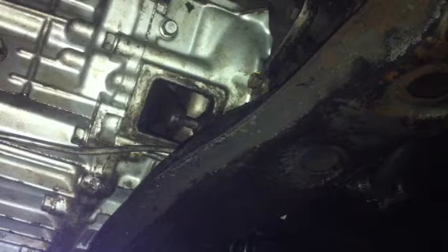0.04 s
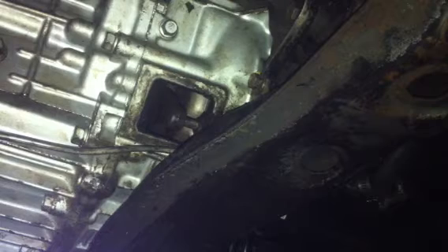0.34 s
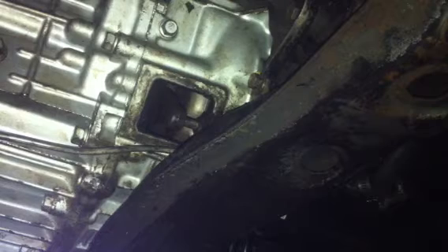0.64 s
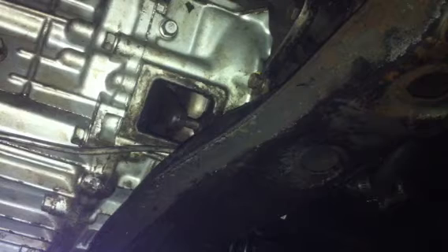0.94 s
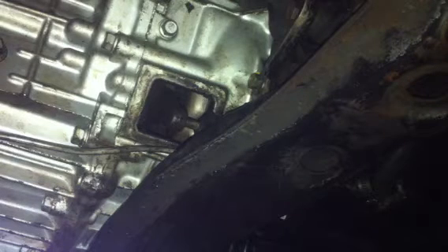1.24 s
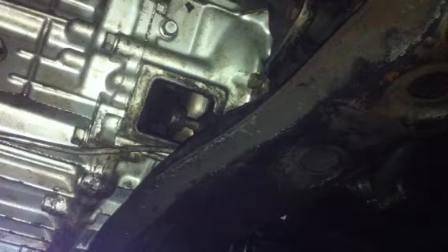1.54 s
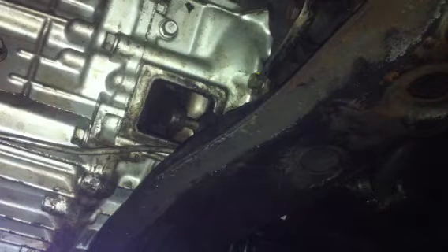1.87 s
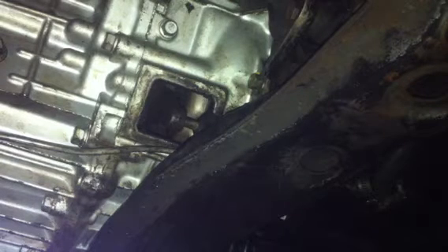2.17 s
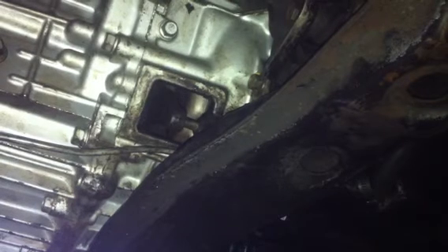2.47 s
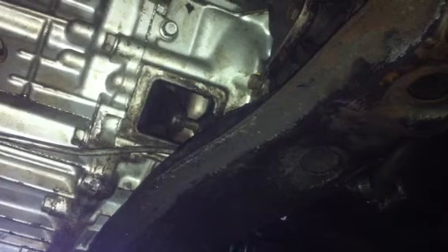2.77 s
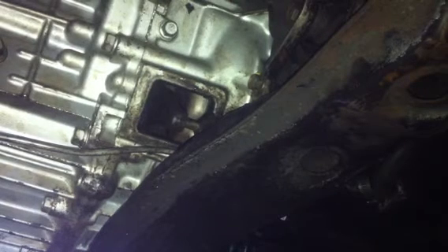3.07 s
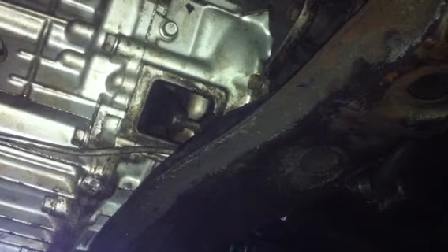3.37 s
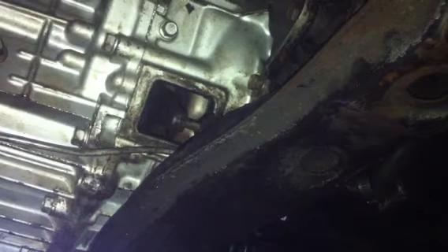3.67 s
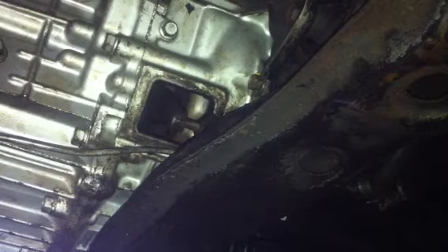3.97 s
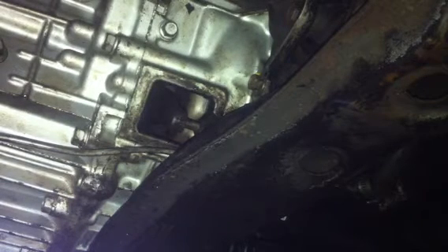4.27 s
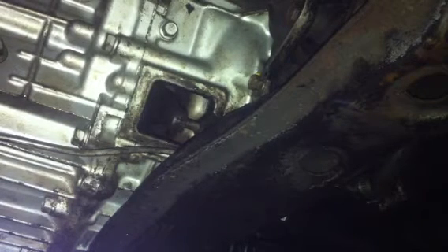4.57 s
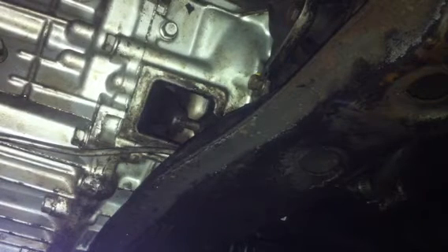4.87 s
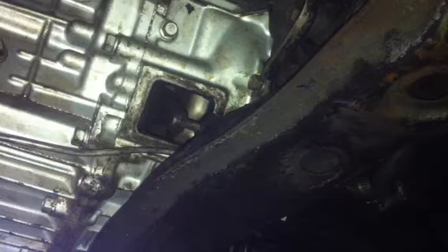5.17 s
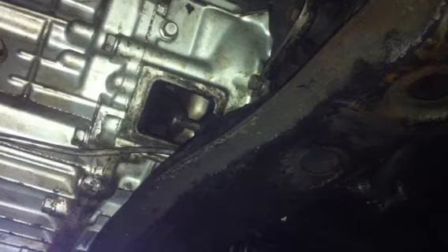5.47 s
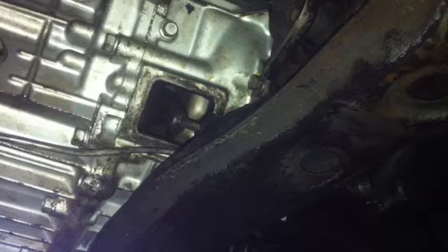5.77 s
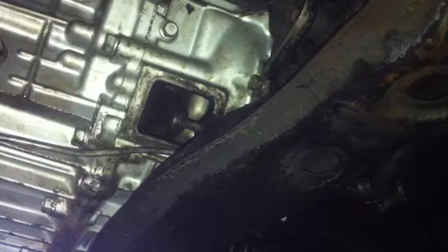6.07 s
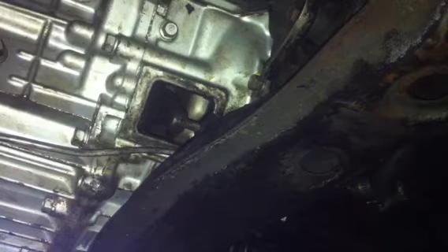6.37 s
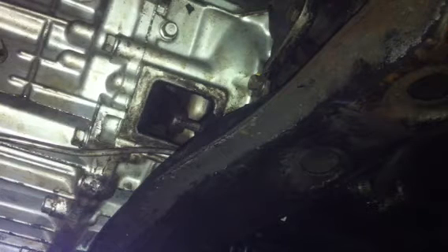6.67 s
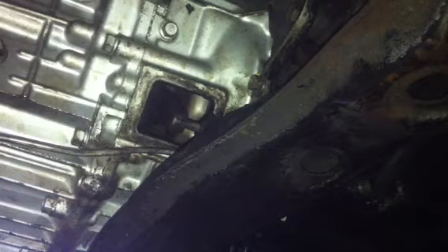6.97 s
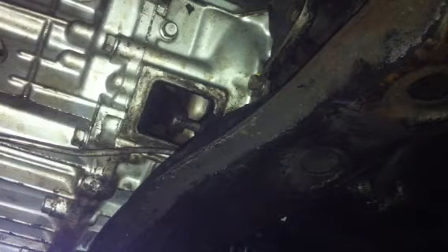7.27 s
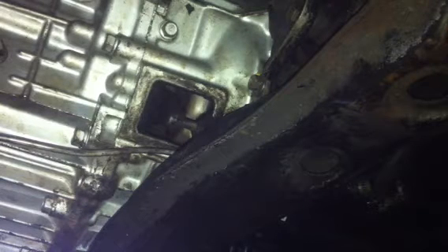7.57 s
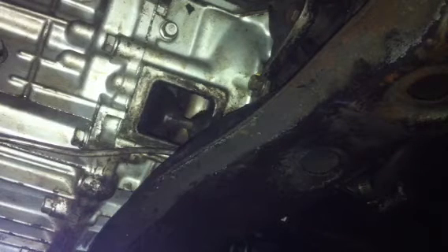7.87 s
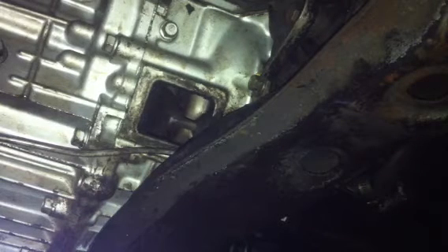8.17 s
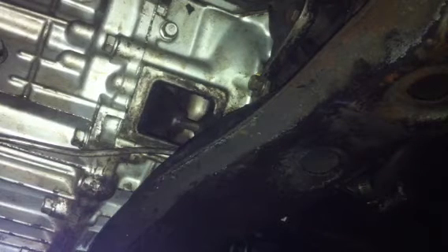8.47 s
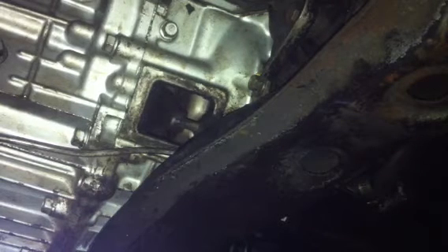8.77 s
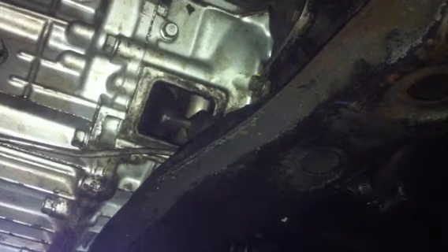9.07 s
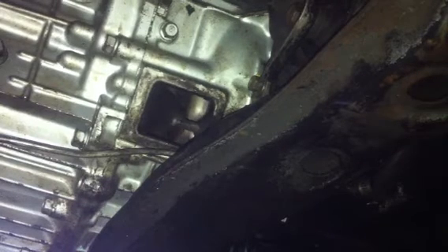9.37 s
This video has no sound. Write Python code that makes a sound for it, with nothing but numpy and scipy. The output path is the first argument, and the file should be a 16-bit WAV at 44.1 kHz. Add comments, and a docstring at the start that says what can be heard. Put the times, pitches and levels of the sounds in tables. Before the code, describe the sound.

Under a parked car with the engine off, a clutch linkage is worked. A metal lever knocks and clicks at uneven intervals, joined by hollow taps from a loose rod. Midway the knocks come closer together, with small steel clinks, soft scraping and a low rumble. After a lull, one firm clack sounds near the end. The microphone is close to the gearbox, with a short echo and faint hiss and hum.

```python
"""Clutch linkage under a parked car

Close to the gearbox, engine off, the clutch is worked by pedal. Each impact excites the natural modes
of the part struck: the lever knocks against its stops and shakes the housing, a loose rod taps
hollowly and a small steel part clinks, all echoing between floor and underbody. Sliding surfaces rub
by stick-slip friction. Behind them lie a soft murmur of the body, a faint hum and microphone hiss."""
import sys
import numpy as np
from scipy import signal
from scipy.fft import rfft, irfft
from scipy.io import wavfile

SR = 44100
rng = np.random.default_rng(int(sys.argv[2]) if len(sys.argv) > 2 else 0)


def wav_out(sig):
    """Save sig, one row per channel (or a flat mono array), as 16-bit PCM at SR to the path in sys.argv[1]."""
    wavfile.write(sys.argv[1], SR, np.round(np.clip(np.atleast_2d(sig).T, -1, 1) * 32767).astype(np.int16))


N = 416304
TIME = np.arange(N) / SR


def amp(db):
    """Amplitude ratio of a level in decibels."""
    return 10 ** (np.asarray(db) / 20)


def unit(x):
    """Normalisation to rms 1."""
    return x / np.sqrt(np.mean(x ** 2) + 1e-20)


def curve_at(points, hz):
    """Interpolation on a logarithmic frequency axis."""
    point_hz, value = np.transpose(points)
    return np.interp(np.log(hz + 1), np.log(point_hz + 1), value)


def coloured(x, spectrum):
    """Spectral shaping, normalised to rms 1."""
    gain = amp(curve_at(spectrum, np.fft.rfftfreq(N, 1 / SR)))
    return unit(irfft(rfft(x) * gain, N))


def drift(rate_hz):
    """Random fluctuation: low-pass noise of rms 1."""
    passband = np.fft.rfftfreq(N, 1 / SR) < rate_hz
    return unit(irfft(rfft(rng.standard_normal(N)) * passband, N))


def decay(t, t60):
    """Exponential damping by 60 dB in t60 seconds."""
    return np.exp(-np.log(1000) * t / t60)


# Air and microphone hiss: (frequency [Hz], relative spectral density [dB])
HISS_SPECTRUM = [(15, -53), (25, -37), (75, -26), (107, 4), (144, -9), (178, 12), (233, -17), (469, -7.5),
                 (782, -11.5), (1050, -1.5), (1270, -7.5), (1900, -8.5), (2060, -16), (5730, -16),
                 (15500, -21.5)]
# Tones of the hum: (frequency [Hz], relative level [dB])
HUM_TONES = [(188.4, -80), (909.8, -80.5), (1206, -83)]
def hiss_and_hum(hiss_db, hum_gain_db, waver_rad):
    """Stationary noise lies under faint tones that waver by random phase modulation."""
    hum = sum(amp(db) * np.sqrt(2) * np.sin(2 * np.pi * hz * TIME + waver_rad * drift(8.6))
              for hz, db in HUM_TONES)
    hiss = coloured(rng.standard_normal(N), HISS_SPECTRUM)
    return amp(hiss_db) * hiss + amp(hum_gain_db) * hum


# Murmur of the car body: (frequency [Hz], relative spectral density [dB])
MURMUR_SPECTRUM = [(50, -23.5), (170, -2), (280, -7.5), (560, -7), (1100, -14.5), (8000, -32.5)]
def body_murmur(level_db):
    """Weight shifting on the pedal stirs the body: dull noise under slow amplitude modulation."""
    return amp(level_db + 2 * drift(4)) * coloured(rng.standard_normal(N), MURMUR_SPECTRUM)


# Sliding strokes: (centre time [s], half length [s], scrape level [dB], rumble level [dB])
STROKES = [(0.27, 0.04, -79, -56), (3.937, 0.1, -73, -58.5), (5.241, 0.086, -53.5, -47),
           (5.408, 0.084, -54, -51), (5.823, 0.043, -54.5, -43.5), (5.96, 0.076, -48.5, -49.5),
           (6.115, 0.075, -54, -41), (6.317, 0.08, -57, -46.5), (6.467, 0.037, -53, -48),
           (6.571, 0.11, -53, -49), (6.779, 0.076, -53.5, -53.5), (7.03, 0.079, -54.5, -62),
           (7.36, 0.062, -45.7, -52.5), (7.91, 0.054, -60, -61), (8.881, 0.042, -55, -71),
           (9.131, 0.12, -61, -57)]
# Scraping surfaces and rumbling body: (frequency [Hz], relative spectral density [dB])
SCRAPE_SPECTRUM = [(240, -39), (400, 3), (445, -8), (942, -8), (1050, -6), (2150, -4), (8930, -21.5),
                   (15500, -34.5)]
RUMBLE_SPECTRUM = [(50, -34), (100, -21), (165, 9.5), (215, -2), (290, 2), (370, -1), (460, -8.5),
                   (620, -6.5), (1200, -16), (3000, -52)]
def sliding(slips_per_s, slip_spread_db, flutter_db):
    """Stick-slip friction: tiny slips scrape and the body rumbles, both in proportion to speed."""
    scrape_gain, rumble_gain = np.zeros((2, N))
    for centre, half, scrape_db, rumble_db in STROKES:
        speed = np.exp(-((TIME - centre) / half) ** 2)
        scrape_gain += amp(scrape_db) * speed
        rumble_gain += amp(rumble_db) * speed
    slipping = rng.random(N) < slips_per_s / SR
    strength = amp(slip_spread_db * np.minimum(rng.exponential(1, N), 4))
    slips = slipping * strength * rng.choice([-1, 1], N)
    scrape = coloured(unit(slips) + rng.standard_normal(N), SCRAPE_SPECTRUM)
    scrape *= amp(flutter_db * drift(70))
    rumble = coloured(rng.standard_normal(N), RUMBLE_SPECTRUM)
    return scrape_gain * scrape + rumble_gain * rumble


# Where an impact's thud, level, clack and tick apply: (frequency [Hz])
TIMBRE_HZ = [170, 600, 2400, 5800]
# Damping of a contact, before decay_scale: (frequency [Hz], 60 dB decay time [s])
CONTACT_DECAY = [(100, 0.43), (500, 0.24), (2000, 0.17), (8000, 0.11)]
# Reverberation between floor and underbody: (frequency [Hz], 60 dB decay time [s])
ECHO_DECAY = [(100, 0.54), (300, 0.46), (1000, 0.43), (3000, 0.26), (10000, 0.37)]
def impacts(blows, modes, spectrum, gain_db, ring_db, echo_db, chatter_s, attack_s, decay_scale,
            resonance_db, resonance_q):
    """Impact excitation: metal on metal gives a dense rattle, damped modes and reverberation.
    Blows are (time [s], level [dB], thud [dB], clack [dB], tick [dB], resonance [Hz])."""
    size = 2 ** 15
    t, hz = np.arange(size) / SR, np.fft.rfftfreq(size, 1 / SR)
    centres = np.geomspace(42, 15200, 18)[:, None]  # half-octave bands
    bands = np.sqrt(np.maximum(1 - 2 * abs(np.log2((hz + 1) / centres)), 0))
    shaped = bands * amp(curve_at(spectrum, hz))
    band_gain = np.sqrt((shaped ** 2).sum(1) / (bands ** 2).sum(1))[:, None]
    # the parts chatter before they settle
    contact = decay(np.maximum(t - chatter_s, 0), curve_at(CONTACT_DECAY, centres) * decay_scale)
    echo = amp(echo_db) * decay(t, curve_at(ECHO_DECAY, centres)) * (1 - np.exp(-t / 0.015))
    onset = 1 - np.exp(-t / (attack_s + 0.58 / centres))  # low bands need a cycle to swell
    envelope = onset * np.hypot(contact, echo)
    mode_hz, mode_db, mode_t60 = np.transpose(modes)[:, :, None]
    mode_envelope = decay(t, mode_t60) * (1 - np.exp(-t / attack_s))
    out = np.zeros(N)
    for time, db, thud, clack, tick, resonance_hz in blows:
        timbre = list(zip(TIMBRE_HZ, [thud, 0, clack, tick]))
        rattle = irfft(rfft(rng.standard_normal(size)) * shaped) * envelope
        rattle *= np.sqrt((envelope ** 2).sum(1) / (rattle ** 2).sum(1))[:, None]
        rattle *= band_gain * amp(curve_at(timbre, centres))
        # each blow lands differently and so shares its energy differently among the modes
        share, phase = rng.uniform(-1.03, 1, (2, len(modes), 1))
        ring = mode_envelope * np.sin(2 * np.pi * mode_hz * t + np.pi * phase)
        ring *= amp(mode_db + ring_db + 4 * share + curve_at(timbre, mode_hz))
        blow = rattle.sum(0) + ring.sum(0)
        # the point of contact brings out one resonance above the rest
        resonance = signal.lfilter(*signal.iirpeak(resonance_hz, resonance_q, fs=SR), blow)
        sound = amp(db + gain_db) * (blow + amp(resonance_db) * resonance)
        span = out[round(time * SR):][:size]
        span += sound[:len(span)]
    return out


MEDIUM_BLOW_DB = -31.5
# Lever on its stops: (time [s], relative level [dB], body thud [dB], contact hardness [dB])
LEVER_KNOCKS = [(0.407, -27, -12.5, -22), (0.519, -44.5, -22, -16.5), (1.521, -19, -20, -17.5),
                (1.551, -39.5, 9, -9), (1.75, -50, 7.5, -20), (2.091, -22, -7.5, -13),
                (2.126, -14, -12.5, -10), (2.314, -39.5, -6, -12), (2.356, -38, -1.5, -12),
                (2.685, -32.5, -2, -16.5), (2.827, -46, -1.5, -27), (3.191, -35.5, 2, -12.5),
                (3.765, -33, -24, -19), (4.027, -44, 0, -20), (4.323, -38, 1.5, -29), (4.526, -41, -7, -14),
                (4.729, -34, -11.5, -9), (5.004, -30.5, -2, -16), (5.016, -31, -6, -5.5),
                (5.192, -26, -17, -11.5), (5.297, -26, -16, -18), (5.34, -28.5, -29, -15),
                (5.407, -37.5, -20, -0.5), (5.694, -32.5, 1.5, -31), (5.725, -25.5, -3.5, -23),
                (5.925, -32, -34, -12), (5.964, -25, -6.5, -17), (6.086, -26.5, -8, -13.5),
                (6.313, -41.5, 4.5, -12), (8.478, -17, -10, -11), (8.761, -31.5, -9, -14.5)]
# Sticking surfaces breaking free: (time [s], relative level [dB])
RELEASE_SNAPS = [(4.527, -60.5), (5.192, -52), (5.924, -46.5), (5.963, -46), (6.085, -47.5), (6.785, -45.5),
                 (8.478, -40.5), (8.762, -48.5)]
# Modes of lever and housing: (frequency [Hz], relative level [dB], 60 dB decay time [s])
HOUSING_MODES = [(180.4, -3.5, 0.45), (213.7, 0, 0.42), (339, -13.5, 0.73), (419.2, -3.5, 0.2),
                 (475, -8, 0.14), (561.6, -6.5, 0.18), (870, -27, 0.14), (923, -24, 0.26), (973, -3, 0.23),
                 (1111, -9, 0.21), (1630, -16.5, 0.28), (1970, -1, 0.16), (2110, -13, 0.3),
                 (2700, -4.5, 0.11)]
# Rattle of the lever: (frequency [Hz], relative half-octave level [dB])
LEVER_SPECTRUM = [(45, -53), (75, -33), (110, -11), (160, -5.5), (300, -10.5), (480, -11), (800, -10),
                  (1100, -9), (1900, -6), (2750, -2.5), (3100, -6), (4800, -6.5), (7000, -10.5),
                  (15000, -22)]
def lever_knocks():
    """Knocks and dry snaps excite the housing; a heavier knock has a longer contact and less treble."""
    knocks, bumps = [], []
    for time, db, thud, hardness in LEVER_KNOCKS:
        tick = hardness - 16.5 - 0.47 * (db - MEDIUM_BLOW_DB)
        knocks.append((time, db, thud, hardness, tick, 471))
        if thud > -14:  # after shaking the body, the lever settles with a dull bump
            bumps.append((time + 0.04, db + thud - 16, 6.5, -7, -23.5, 181))
    snaps = [(time, db, 2, -0.44, 6.1, 232) for time, db in RELEASE_SNAPS]
    return impacts(knocks + bumps + snaps, HOUSING_MODES, LEVER_SPECTRUM,
                   gain_db=-8, ring_db=-3.5, echo_db=-10, chatter_s=0.0088, attack_s=0.00076,
                   decay_scale=0.81, resonance_db=-4, resonance_q=8.4)


# Taps of the loose rod: (time [s], relative level [dB], contact hardness [dB], resonance [Hz])
ROD_TAPS = [(0.907, -47, -0.5, 630), (0.975, -58.5, 6, 635), (1.026, -46.5, -6.5, 611),
            (1.494, -31, -7.5, 740), (7.457, -36, -6, 743), (8.286, -52.5, -3, 742), (8.352, -46.5, 5, 650),
            (8.397, -49, -1.5, 627), (8.466, -27.5, -18, 596), (8.767, -33, -11.5, 730),
            (9.399, -53.5, 5, 645)]
# Modes of the rod: (frequency [Hz], relative level [dB], 60 dB decay time [s])
ROD_MODES = [(636, -5, 0.22), (689, 4.5, 0.094), (930, -9, 0.26), (1584, -6, 0.18), (2810, -17, 0.085),
             (2900, -36, 0.11)]
# Rattle of the rod: (frequency [Hz], relative half-octave level [dB])
ROD_SPECTRUM = [(100, -52), (300, -9), (700, -18.5), (1100, -13), (2000, -10.5), (4200, -9), (8000, -24),
                (15000, -36)]
def rod_taps(thud_db):
    """A narrow midrange resonance makes the rod sound hollow; a stronger tap ticks more sharply."""
    taps = []
    for time, db, hardness, hz in ROD_TAPS:
        tick = hardness + 5 + 0.7 * (db - MEDIUM_BLOW_DB)
        taps.append((time, db, thud_db, hardness, tick, hz))
    return impacts(taps, ROD_MODES, ROD_SPECTRUM,
                   gain_db=-3.5, ring_db=-5.5, echo_db=-11, chatter_s=0.0025, attack_s=0.00089,
                   decay_scale=0.59, resonance_db=11.5, resonance_q=20.3)


# Clinks of the small steel part: (time [s], relative level [dB], resonance [Hz])
STEEL_CLINKS = [(3.296, -58.5, 4150), (5.467, -47.5, 3400), (5.545, -46.5, 3200), (5.723, -45, 4080),
                (6.232, -51.5, 5600), (6.284, -35.5, 4960), (6.287, -43, 1990), (7.61, -61.5, 2660),
                (8.117, -63, 3570), (8.479, -29, 3260), (9.269, -56, 4500), (9.315, -58.5, 1850)]
# Modes of the steel part: (frequency [Hz], relative level [dB], 60 dB decay time [s])
STEEL_MODES = [(1594, -8.5, 0.33), (3190, -11, 0.095), (3195, -4, 0.053), (3360, -24, 0.092),
               (3470, -8.5, 0.18), (3800, -4.5, 0.1), (4190, -8, 0.11), (5050, -25, 0.099),
               (5440, -5.5, 0.13)]
# Rattle of the steel part: (frequency [Hz], relative half-octave level [dB])
STEEL_SPECTRUM = [(150, -35), (1000, -20), (2200, -13), (5200, -17.5), (8000, -16.5), (15000, -42)]
def steel_clinks(thud_db, clack_db, tick_db):
    """A small, stiff part has high natural frequencies; each clink brings out its own pitch."""
    clinks = [(time, db, thud_db, clack_db, tick_db, hz) for time, db, hz in STEEL_CLINKS]
    return impacts(clinks, STEEL_MODES, STEEL_SPECTRUM,
                   gain_db=2.5, ring_db=-11, echo_db=-11, chatter_s=0.0017, attack_s=0.0014,
                   decay_scale=0.69, resonance_db=12.5, resonance_q=10.7)


def scene():
    """Superposition: the sound pressures of all sources add at one point."""
    mix = lever_knocks()
    mix += rod_taps(thud_db=-16.5)
    mix += steel_clinks(thud_db=-22, clack_db=2.4, tick_db=-3.5)
    mix += sliding(slips_per_s=1200, slip_spread_db=1, flutter_db=1.1)
    mix += body_murmur(level_db=-63.5)
    mix += hiss_and_hum(hiss_db=-65.5, hum_gain_db=1, waver_rad=0.84)
    return mix[None]


def record(dry):
    """Band limiting: a steep low-pass filter removes the highest treble."""
    low_pass = signal.firwin(511, 15780, window=("kaiser", 9), fs=SR)
    return signal.oaconvolve(dry, low_pass[None], "same")


dry = scene()
out = record(dry)
wav_out(out)
```